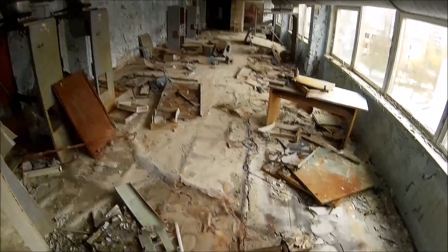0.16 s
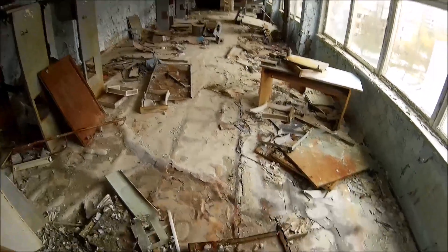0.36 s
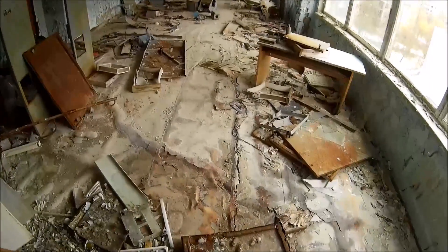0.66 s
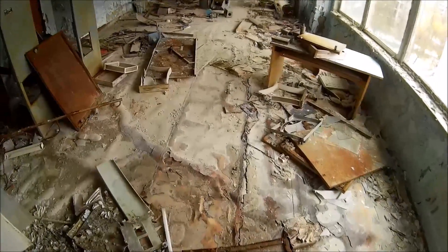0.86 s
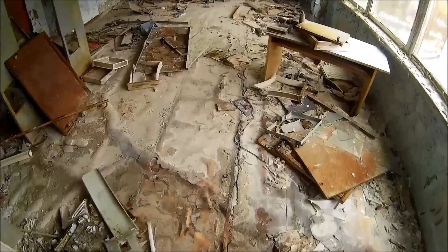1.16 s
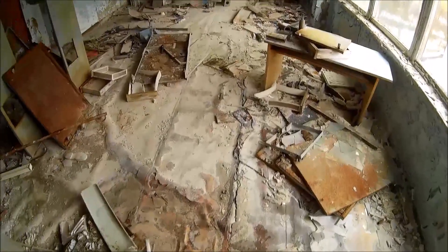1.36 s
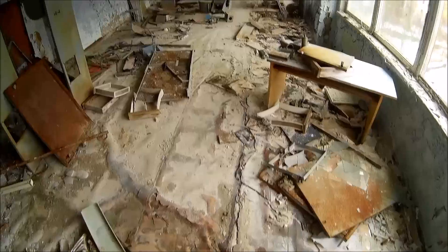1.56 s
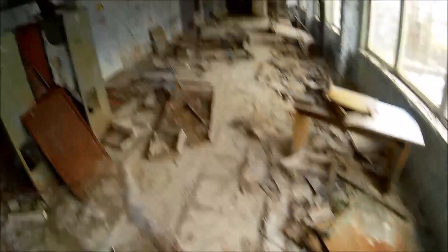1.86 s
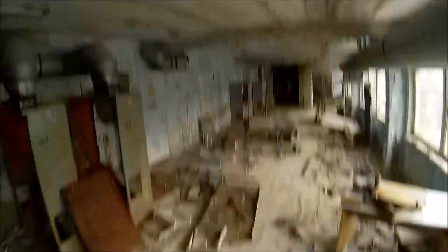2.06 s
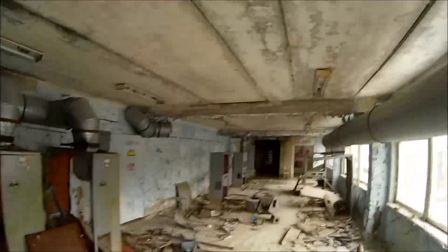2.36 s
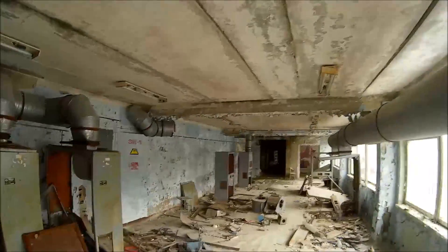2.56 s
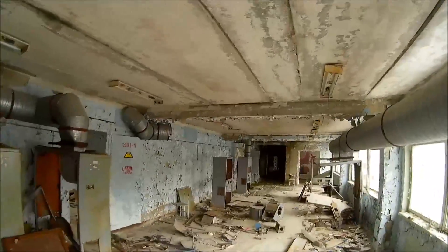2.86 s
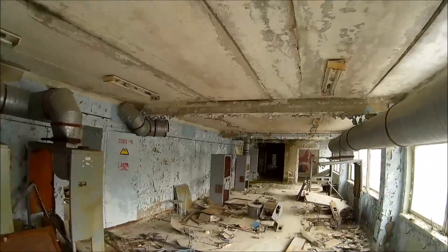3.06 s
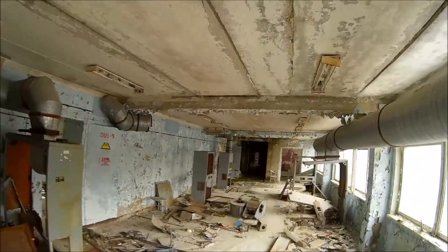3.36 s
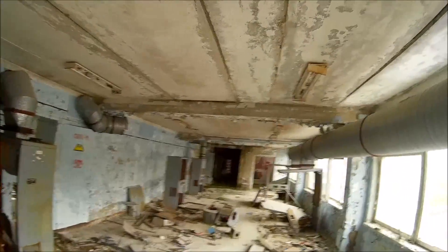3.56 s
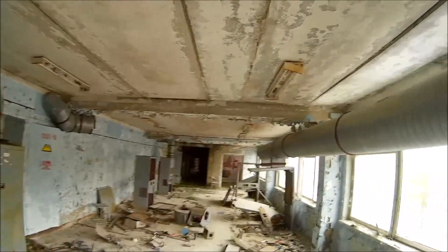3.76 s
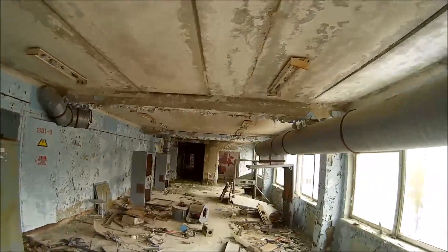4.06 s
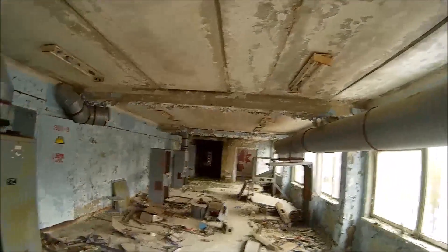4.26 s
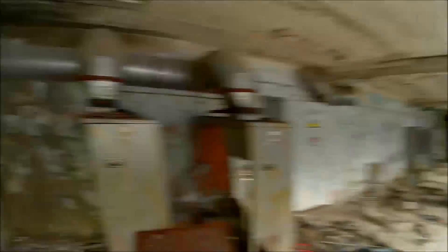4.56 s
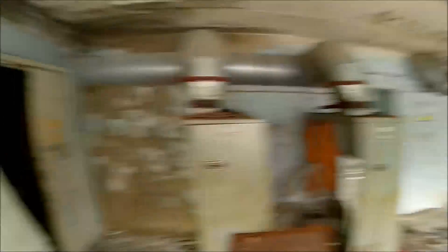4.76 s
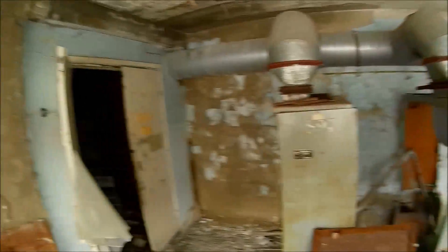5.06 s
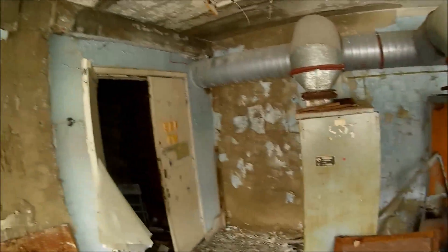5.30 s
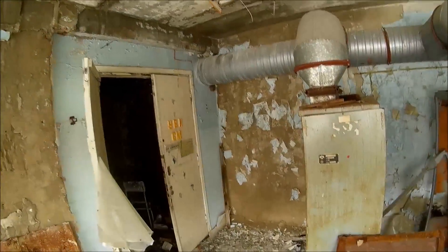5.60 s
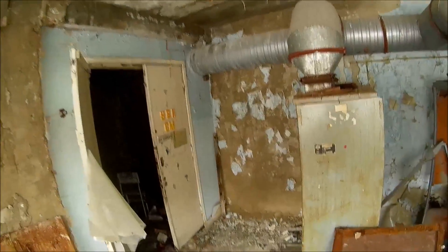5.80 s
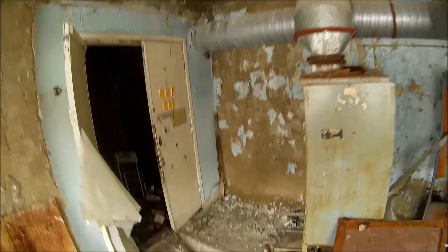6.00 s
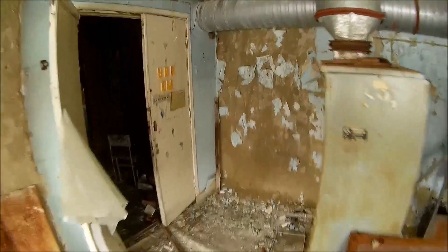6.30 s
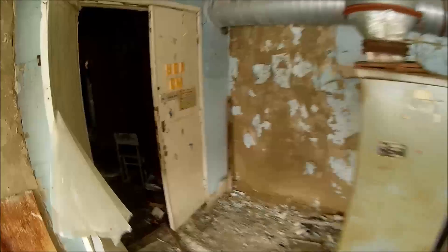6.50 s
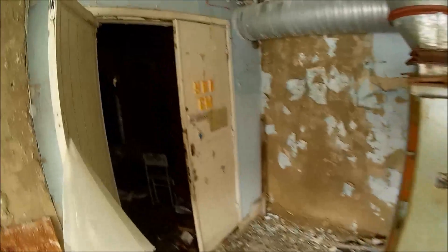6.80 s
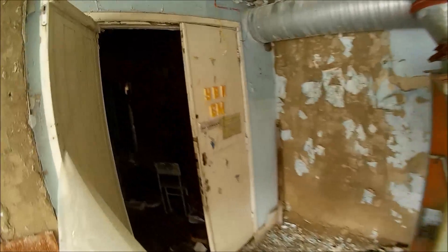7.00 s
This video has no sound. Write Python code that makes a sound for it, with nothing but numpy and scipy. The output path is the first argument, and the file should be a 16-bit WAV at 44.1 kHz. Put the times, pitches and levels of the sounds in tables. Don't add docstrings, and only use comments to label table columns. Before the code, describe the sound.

Low hiss and faint shuffling open, heard from a small sealed camera carried by the walker. From about one second, boots tread heavily on plaster rubble: chunks snap, crumble and grind underfoot, with a short echo from bare concrete walls. After four seconds only lighter pats and scuffs remain, then a near-quiet pause and a few small late knocks of loose chips.

```python
import sys
import numpy as np
from scipy import signal
from scipy.fft import rfft, irfft
from scipy.io import wavfile
from scipy.ndimage import uniform_filter1d, map_coordinates

SR = 44100
rng = np.random.default_rng(int(sys.argv[2]) if len(sys.argv) > 2 else 0)


def gain_from_db(level_db):
    decades = np.asarray(level_db, float) / 20
    return 10 ** decades


def wrap_up_sound(samples):
    columns = np.atleast_2d(samples).T
    tamed = np.clip(columns, -1, 1)
    steps = np.round(tamed * 32767).astype(np.int16)
    wavfile.write(sys.argv[1], SR, steps)


N = 314874


def along(points, hz):
    f, v = np.transpose(points)
    return np.interp(np.log(hz + 1), np.log(f + 1), v)


def unit(x):
    return x / np.sqrt(np.mean(x ** 2, axis=-1, keepdims=True) + 1e-20)


def wobble(rate):
    knots = rng.standard_normal(int(N * rate / SR) + 4)
    return map_coordinates(knots, [np.arange(N) * rate / SR])


def causal(gain):
    cepstrum = irfft(np.log(gain + 1e-5))
    half = cepstrum.shape[-1] // 2
    cepstrum[..., 1:half] *= 2
    cepstrum[..., half + 1:] = 0
    return irfft(np.exp(rfft(cepstrum)))[..., :half]


# time in seconds, how long before it the offset dips in seconds.
RESETS = [
    (.0304, .0304),
    (.4714, .0219),
    (5.2146, .0314),
    (5.5464, .02),
    (6.0448, .0404),
    (7.031, .0359),
]
# seconds after it, size in thousandths of full scale.
RESET_STEPS = [
    (0, 3.8),
    (.066, 1.07),
    (.167, -1.5),
    (.225, -1.2),
]
# size in thousandths of full scale, list of times in seconds.
GAIN_STEPS = [
    (-1.35, [.9478, 1.6398, 2.3846, 2.4614, 2.5657, 3.098, 3.2147, 4.1181, 4.1566, 4.3207, 4.4923, 4.6415, 4.9632, 5.054, 6.4144, 6.8295, 6.8998]),
    (1.4, [1.6647, 2.4774, 3.2307, 3.3569, 4.0533, 4.2005, 4.2364, 4.3486, 6.3471, 6.8514]),
    (2.6, [.7668, 1.0416, 2.7288, 4.6564]),
]


def offset_jumps():
    dip = -2.2
    steps = []
    for s, lead in RESETS:
        steps += [(s + after, size) for after, size in [(-lead, dip), *RESET_STEPS]]
    for size, times in GAIN_STEPS:
        steps += [(s, size) for s in times]
    jumps = np.zeros(N + SR)
    for s, size in steps:
        jumps[round(abs(s) * SR)] = size / 1000
    return jumps[:N]


# frequency in Hz, density in dB per Hz.
HISS = [(18, -19), (30, -12), (53, -13), (238, -14), (1490, -30.5), (6650, -35.5), (8870, -35), (9600, -36),
        (14200, -33), (15800, -42)]
# frequency in Hz, level in dB rms.
WHINE = [(8559, -101), (8624, -88.5), (8694, -83)]


def preamp():
    hz, t = np.fft.rfftfreq(N, 1 / SR), np.arange(N) / SR
    hiss = unit(irfft(rfft(rng.standard_normal(N)) * gain_from_db(along(HISS, hz)), N))
    hiss = hiss * gain_from_db(0.8 * wobble(6)) * gain_from_db(-62)
    whine = np.zeros(N)
    for f, db in WHINE:
        level = gain_from_db(db + 5.5 + 2.4 * wobble(8))
        whine += level * np.sin(2 * np.pi * f * t + 0.56 * wobble(43))
    leak = np.exp(-t[:SR] / 0.08) * (1 - np.exp(-t[:SR] / 0.00011))
    return hiss + whine + signal.fftconvolve(offset_jumps(), leak)[:N]


# frequency in Hz, time to fall 60 dB in seconds.
WALLS = [(150, 1), (500, 0.68), (1300, 0.55), (4000, 0.36), (12000, 0.37)]


def walls(x, wet_db, gap=0.004, block=SR // 4):
    pieces = np.pad(x, (0, -N % block)).reshape(-1, block)
    hz, t, z = signal.stft(rng.standard_normal((len(pieces), SR)), SR, nperseg=256)
    decay = gain_from_db(-60 * t / along(WALLS, hz)[:, None])
    tails = signal.istft(z * decay, SR, nperseg=256)[1]
    tails = tails / np.linalg.norm(tails, axis=1, keepdims=True)
    answers = signal.fftconvolve(pieces, tails, axes=1)
    wet = np.zeros(N + 3 * SR)
    for k, answer in enumerate(answers):
        wet[k * block + round(gap * SR):][:len(answer)] += answer
    return gain_from_db(wet_db) * wet[:N]


# frequency in Hz, density in dB per Hz.
RUBBLE = [(59, -71), (100, -22.5), (173, -17), (276, -13.5), (380, -11.5), (580, -5.5), (780, -5),
          (1270, -6), (2900, -10), (5250, -8), (6770, -12.5), (11300, -22), (13100, -37), (14800, -23),
          (15800, -43.5)]
# frequency in Hz, width in Hz, lift in dB.
HOUSING = [(1292, 820, 7), (2525, 450, 6), (3745, 870, 7), (5260, 550, 2), (11800, 730, 4)]
VOICE_EDGES_HZ = [700, 1950, 7000]


def voices():
    slab_hz = 476
    hz = np.fft.rfftfreq(4096, 1 / SR)
    above = [1 / (1 + (edge / (hz + 1)) ** 9) for edge in VOICE_EDGES_HZ]
    shares = np.array([1 - above[0], above[0] - above[1], above[1] - above[2], above[2]])
    shares[0] /= 1 + (hz / slab_hz) ** 4
    lift_db = sum(db / (1 + (2 * (hz - centre) / width) ** 2) for centre, width, db in HOUSING)
    ring = causal(gain_from_db(along(RUBBLE, hz) + lift_db) * np.sqrt(np.abs(shares)))
    return ring / np.linalg.norm(ring, axis=1, keepdims=True)


def cracks(size, per_s, spread_db):
    chance, sign = rng.random(size), rng.standard_normal(size)
    big = np.minimum(rng.exponential(size=size), 3)
    return (chance < per_s / SR) * np.sign(sign) * gain_from_db(spread_db * big)


def pressure(rows, colour_db, t):
    build_up_db = 15.5
    power = np.zeros(len(t))
    for s, db, build, hold, fade in rows:
        start = max(round((s - 2 * abs(build)) * SR), 0)
        near = slice(start, round((s + abs(hold) + abs(fade)) * SR))
        early = np.maximum(s - t[near], 0)
        late = np.maximum(t[near] - s - abs(hold), 0)
        level_db = db - build_up_db * early / max(build, 0.002) - 60 * late / max(fade, 0.02)
        power[near] += gain_from_db(level_db) ** 2
    return gain_from_db(colour_db)[:, None] ** 2 * power


# thud, body, grit and dust in dB
SHUFFLES = [(0.01, -60, .01, 0.23, 1.3), (1.0, -57.5, .1, .03, .2), (1.45, -51, .05, 0.16, .5),
            (1.74, -44.5, 0.049, 0.062, 0.4), (2.25, -59, 0.027, 0.06, 1.5),
            (2.48, -47.5, 0.041, 0.0062, 0.7), (3.2, -55.5, 0.29, 0.25, -3), (3.43, -46, 0.19, .01, -1.5),
            (4.003, -45.5, 0.0072, 0.025, 0.44), (4.192, -47, 0.0054, 0.062, 0.33),
            (4.34, -41, 0.0046, 0.038, 0.14), (4.615, -46, 0.41, 0.0046, .22),
            (4.78, -50.5, .03, 0.14, 0.5), (5.724, -57, .015, 0.021, -0.6), (5.81, -62, .006, .03, 5),
            (6.106, -54, 0.023, 0.17, .1), (6.36, -58.5, .02, 0.12, 2.5), (6.5, -61, .02, .12, -0.5),
            (0.76, -63, .006, .06, 3), (3.22, -73, 0.0052, .03, 3), (1.655, -48.5, .005, 0.053, 0),
            (6.68, -60, .03, .015, 0.5), (7.12, -53, .2, .05, .3)]
SHUFFLE_DB = [-6, 0.5, -5, -12]
PATS = [
    (4.003, -43.5, .004, .02, .5),
    (4.679, -35.5, 0.0035, .04, .3),
    (6.328, -50, .004, .02, .7),
    (6.645, -44, .004, .02, .6),
    (7.088, -47.5, .004, .05, .3),
    (2.78, -30, .02, .08, .45),
]
PAT_DB = [-19, -1.5, -14, -32]
SCUFFS = [(0.01, -55.5, 0.011, 0.069, -0.3), (1.064, -38.5, .003, 0.0089, 0.5), (1.95, -37, .05, 0.13, 0.5),
          (2.178, -34.5, .004, 0.021, 0.14), (2.47, -59, .005, 0.036, 2), (3.54, -35, 0.011, 0.089, 0.47),
          (4.72, -48.5, .03, 0.027, -0.2), (4.85, -60, .02, 0.12, -0.2), (5.76, -62, .03, 0.1, .3),
          (6.232, -56, .004, 0.022, -0.1), (6.83, -58, .03, 0.064, 0)]
SCUFF_DB = [-25, -12, 0, -7]
HEELS = [
    (0.758, -45.5, .006, .06, 0.3),
    (1.066, -32.5, 0.0077, 0.013, 0.6),
    (1.885, -30.5, 0.022, 0.038, 0.49),
    (3.35, -46, .006, .03, -0.7),
    (4.57, -47.5, 0.014, .05, 0.8),
    (2.68, -51, 0.017, .04, 3),
    (4.725, -38.5, 0.065, 0.015, 0.1),
    (6.32, -49, 0.032, 0.025, 0.5),
    (6.506, -51, 0.0044, .02, .5),
]
HEEL_DB = [2, -10.5, -29.5, -23]
TREADS = [
    (1.066, -40, .008, 0.11, 0.1),
    (1.04, -44.5, 0.041, 0.024, -3),
    (1.2, -30, 0.036, .001, 0.82),
    (1.884, -30, 0.029, 0.32, -0.07),
    (2.75, -28, 0.029, 0.12, 0.26),
    (3.446, -32, 0.013, 0.031, 0.29),
    (3.535, -29.5, 0.025, 0.072, 0.61),
    (3.7, -32.5, 0.039, 0.014, -0.7),
    (4.7, -52.5, .02, 0.03, 2.2),
]
TREAD_DB = [-13, 0, -5.5, -16]
CRUSH_DB = [-20, -1, -9.5, -21]
# thud, body, grit and dust [dB].
SETTLING_DB = [-69, -65, -69.5, -67.5]


def grind():
    t = np.arange(N) / SR - 0.003
    rise_s, hold_s, fade_s = 0.004, 0.0071, 0.21
    crush = [(s, db + crush_db, rise_s, hold_s, fade_s) for s, db, _, _, crush_db in SNAPS]
    kinds = [(TREADS, TREAD_DB), (SHUFFLES, SHUFFLE_DB), (HEELS, HEEL_DB), (crush, CRUSH_DB),
             (SCUFFS, SCUFF_DB), (PATS, PAT_DB)]
    power = sum(pressure(rows, colour_db, t) for rows, colour_db in kinds)
    power = power + gain_from_db(SETTLING_DB)[:, None] ** 2
    clumps_db = 1.77 * wobble(60) + 1.1 * wobble(25)
    weight = np.sqrt(power) * gain_from_db(clumps_db - 7.0)
    return weight * unit(cracks(N, per_s=2600, spread_db=1.0))


# start in seconds, knock peak in dB,
# knock pitch in Hz, grit in dB over the knock.
CHIPS = [(0.154, -51, 398, -11), (0.3, -49, 1417, -16), (0.434, -46.5, 1190, -16), (0.754, -32.5, 408, -19),
         (0.793, -32, 259, -5), (1.472, -42.5, 450, 12.5), (1.568, -46, 780, 8), (1.654, -34, 1320, -32),
         (1.708, -43, 1400, -28), (1.74, -27, 1450, -19), (2.466, -47, 700, -7), (2.579, -47, 875, -10),
         (2.669, -49, 333, -19), (3.184, -53, 1600, 10), (3.218, -35.5, 860, -29), (3.33, -46, 530, -23),
         (3.348, -35.5, 467, -27), (4.003, -36.5, 910, -6), (4.215, -41, 346, -16), (4.241, -42, 614, 3),
         (4.525, -47, 540, 6), (4.931, -40.5, 1440, -7), (5.739, -44, 1070, -19), (6.23, -40, 1690, -8),
         (6.264, -37.5, 1090, -20), (6.327, -33.5, 960, -32), (6.434, -46, 1320, -11),
         (6.505, -38.5, 314, -24), (7.092, -43, 640, -25)]
# start in seconds, knock peak in dB, knock pitch in Hz,
# grit in dB over the knock, crush of the remains in dB over the knock.
SNAPS = [(1.036, -32, 1370, 1.5, -10), (1.064, -22, 840, -11, -7), (1.108, -11, 1230, -19, -9),
         (1.166, -17, 596, -8, 0), (1.326, -26.5, 1300, -19, -7.5), (1.88, -27, 610, -25, 1),
         (1.92, -17.5, 1650, -27, 3), (2.011, -30, 656, -15, 1), (2.058, -26, 1030, -8, -11),
         (2.078, -27, 764, 11, -3), (2.178, -25.5, 870, 7.5, -3), (2.191, -50, 1240, -7, -3),
         (2.721, -34.5, 1330, -23, 1), (2.75, -11.5, 1230, -21, -6), (2.772, -12.5, 1230, 0.5, -10),
         (3.443, -30, 1260, 8.5, -3), (3.529, -16.5, 1040, -28, -4), (3.612, -31, 1200, 15, 2.5),
         (4.193, -52, 654, 2, -21), (4.339, -29.5, 1100, -15.5, -7), (4.679, -26.5, 865, -35, -25),
         (4.708, -35.5, 880, -26, -17), (5.811, -39.5, 853, -6, -10), (6.645, -34, 865, -28, -22)]
# thud, body, grit and dust [dB over the knock].
FIRST_CRACK_DB = [-20, -1, -6.5, -13]


def snaps(fine_db, knock_db, turns):
    snap_crumble_s, chip_crumble_s = 0.012, 0.013
    dust_db, dust_follows = -14.5, 0.95
    hard_hz, damped_hz = 910, 400
    force, knocks = np.zeros((4, N + SR)), np.zeros(N + SR)
    t = np.arange(SR // 8) / SR
    breaks = [(*row[:4], snap_crumble_s) for row in SNAPS]
    breaks += [(*row, chip_crumble_s) for row in CHIPS]
    for s, db, hz, grit_db, crumble in breaks:
        at = round(s * SR)
        shed = 0.45 * cracks(len(t), per_s=900, spread_db=3.0) * np.exp(-t / max(crumble, 0.001))
        shed[0] = 1
        onset = 1 - np.exp(-3 * t * hz)
        ring = np.sin(2 * np.pi * hz * t) * np.exp(-t * max(hz, damped_hz) / turns) * onset
        knock = signal.fftconvolve(shed, ring)[:len(t)]
        knocks[at:][:len(t)] += gain_from_db(db + knock_db) * knock / np.abs(knock).max()
        voice_db = np.array([0, 0, grit_db, dust_db + dust_follows * grit_db])
        force[:, at:][:, :len(t)] += gain_from_db(db + voice_db + fine_db)[:, None] * shed
        force[:, at] += gain_from_db(db + np.array(FIRST_CRACK_DB)) * min(hz / hard_hz, 1) ** 2
    return force[:, :N], knocks[:N]


def scene():
    force, knocks = snaps(fine_db=np.array([-2.5, -5.5, 4, 9.5]), knock_db=-2.5, turns=1.6)
    rubble = signal.fftconvolve(force + grind(), voices(), axes=1)[:, :N].sum(axis=0)
    steps = knocks + rubble
    return (steps + walls(steps, wet_db=-7.0))[None]


def suppressed(x, knee_db, slope):
    power = np.abs(uniform_filter1d(x ** 2, SR // 40))
    return x * (power / (power + gain_from_db(2 * knee_db))) ** slope


# time in seconds, lowest frequency lost in Hz.
DROPOUTS = [(.4992, 1700), (.6284, 2300), (1.0347, 2500), (1.2684, 6000), (2.3336, 5000), (2.4207, 2500),
            (2.6326, 1900), (2.9547, 3000), (3.6789, 6000), (3.9779, 2000), (4.7673, 3000), (5.2579, 2000),
            (5.4059, 1400), (5.4494, 1400), (5.5133, 1700), (5.6845, 2000), (5.7252, 1900), (6.921, 1500)]


def treble_dropouts(x, kept=0.2, left_db=-20):
    hz, t, z = signal.stft(x, SR, nperseg=512, noverlap=448)
    gain = np.ones(z.shape[1:])
    for s, low_hz in DROPOUTS:
        lost = np.repeat(rng.random(129) > kept, 2)[:len(hz)]
        lost = lost & (hz > low_hz) & (abs(hz - WHINE[1][0]) > 150)
        gain[np.ix_(lost, abs(t - s) < 0.009)] = gain_from_db(left_db)
    return signal.istft(z * gain, SR, nperseg=512, noverlap=448)[1][:, :N]


def band_limit(x):
    return signal.sosfilt(signal.butter(12, 16290, fs=SR, output="sos"), x)


def record(dry):
    port_hz, top_hz = 150, 15750
    port = signal.butter(3, port_hz, "highpass", fs=SR, output="sos")
    inside = suppressed(signal.sosfilt(port, dry), knee_db=-34, slope=0.091)
    inside = inside / (1 + np.abs(inside / 0.3) ** 4) ** (1 / 4)
    in_band = np.fft.rfftfreq(N, 1 / SR) < top_hz
    limited = irfft(rfft(inside + preamp()) * in_band, N)
    mix = treble_dropouts(limited)
    return band_limit(mix)


dry = scene()
out = record(dry)
wrap_up_sound(out)
```